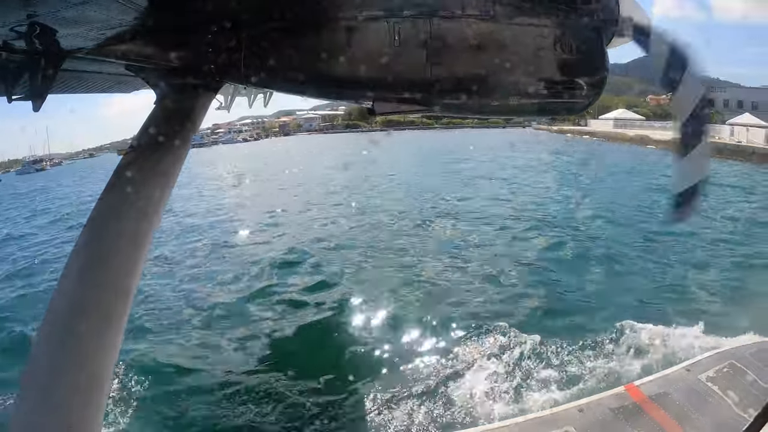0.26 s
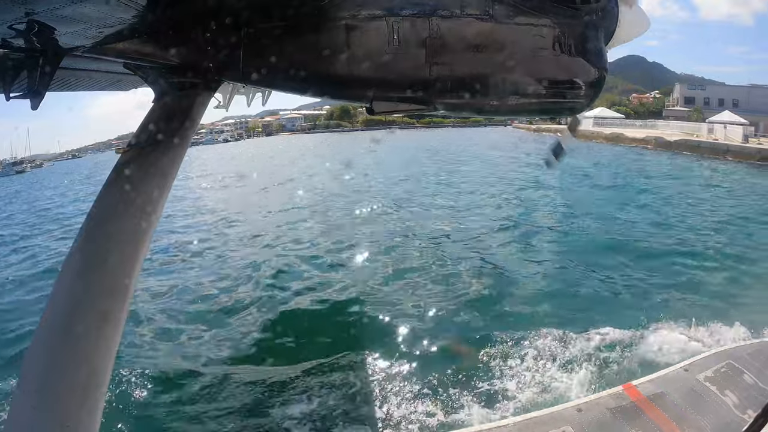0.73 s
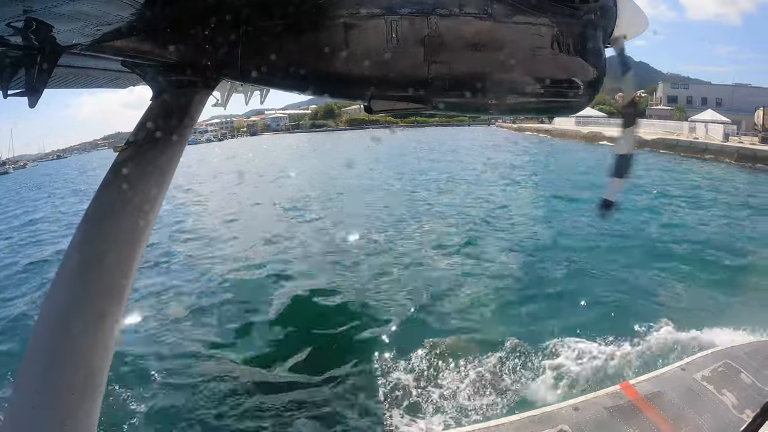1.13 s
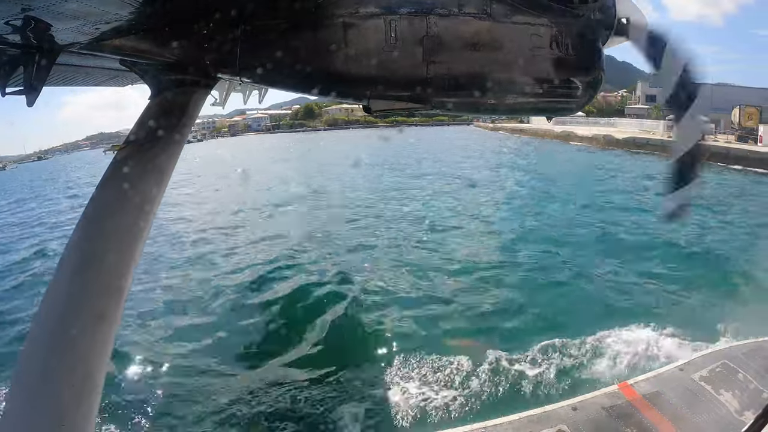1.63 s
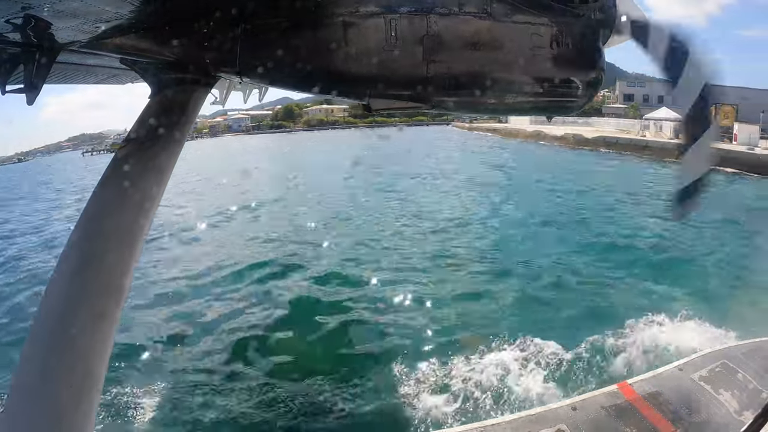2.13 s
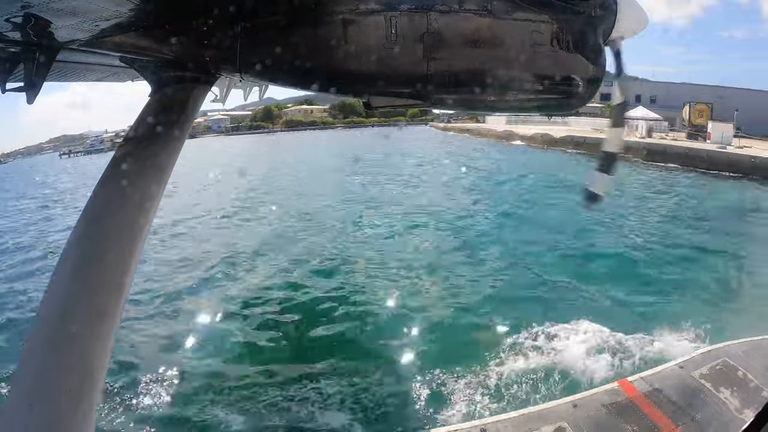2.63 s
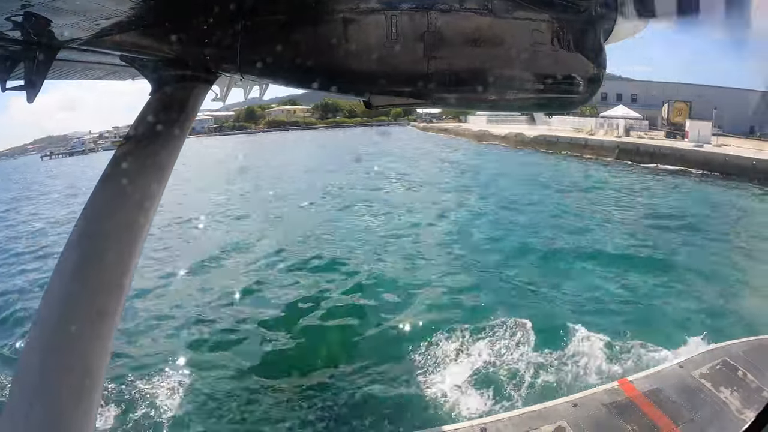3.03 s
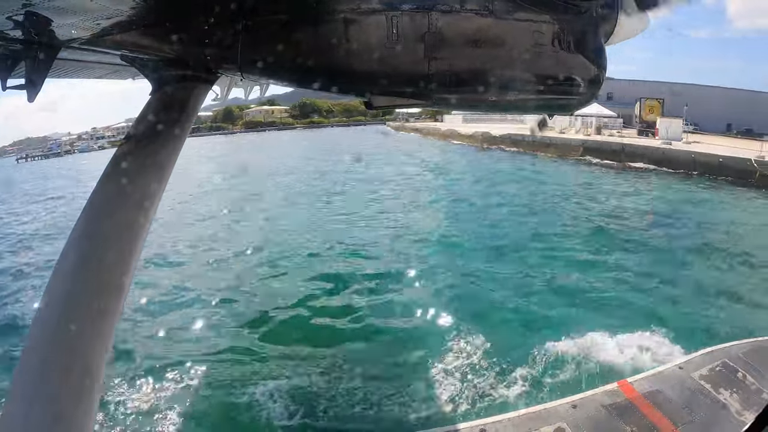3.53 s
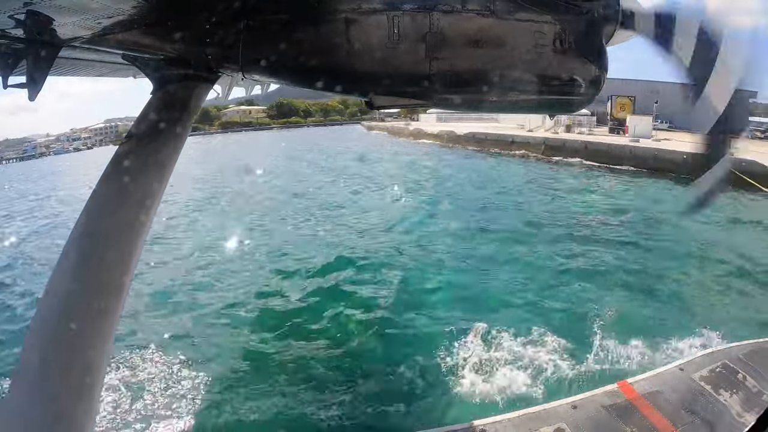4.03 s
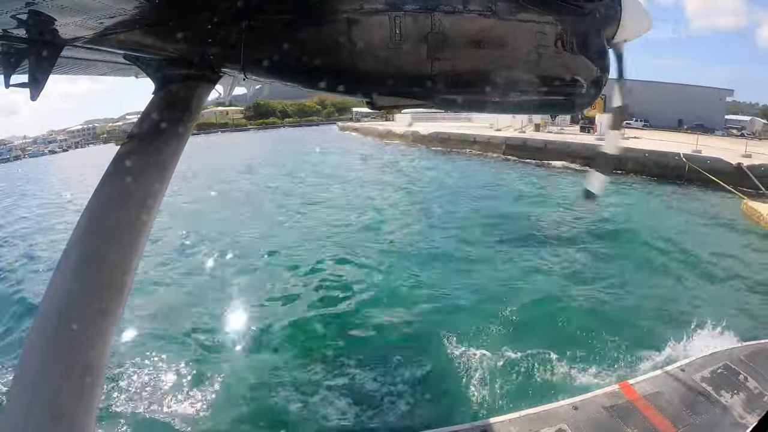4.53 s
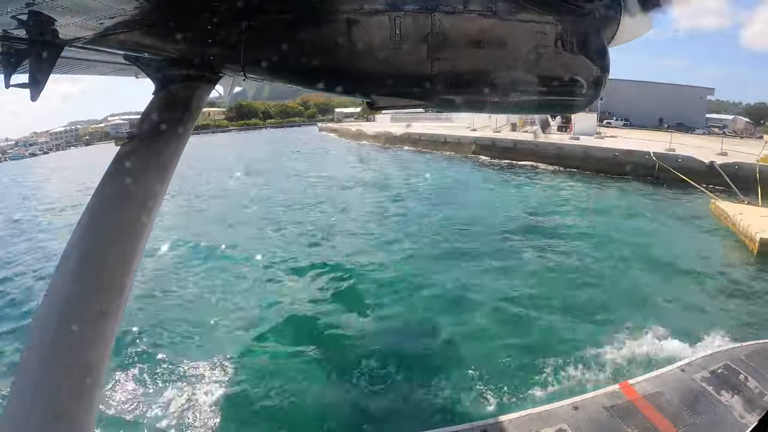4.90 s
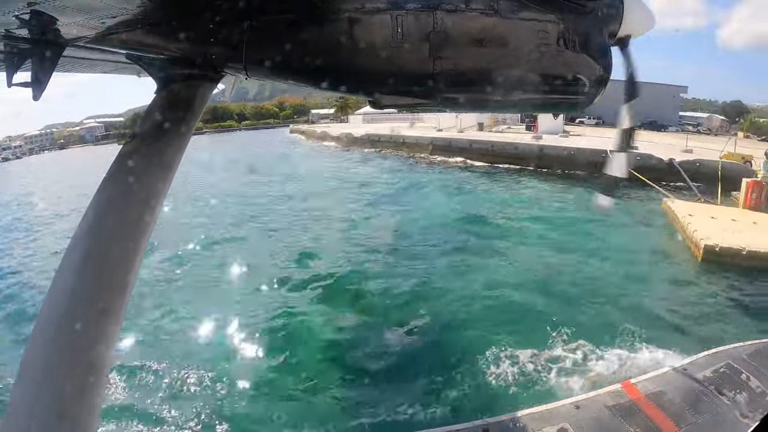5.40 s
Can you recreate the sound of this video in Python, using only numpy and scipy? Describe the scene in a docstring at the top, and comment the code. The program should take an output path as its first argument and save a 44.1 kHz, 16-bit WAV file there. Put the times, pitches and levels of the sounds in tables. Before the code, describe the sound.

Inside a floatplane cabin, turboprop propellers drone and throb deeply, sag slightly, then rise in pitch as power is added over a steady rushing roar.

```python
"""The near propeller of a twin turboprop floatplane taxiing on water, heard in the cabin: a harmonic series
on its blade rate, which slackens and then speeds up as power is added. The far propeller, a slower and
rougher series near idle, beats against it and almost fades out midway. The compressor whine dips, climbs
and then wavers, a modulated blade tone; a gearbox mesh tone rings out over narrow noisy tones of fixed pitch.
Exhaust, propeller wash and jet hiss are coloured noise, coming through the cabin wall."""
import sys
import numpy as np
from scipy import signal
from scipy.fft import rfft, irfft, next_fast_len
from scipy.io import wavfile

SR = 44100
rng = np.random.default_rng(int(sys.argv[2]) if len(sys.argv) > 2 else 0)


def unload_audio(sound):
    """Save the sound as a 16-bit wav file, at the path given as the first command line argument."""
    columns = np.transpose(np.atleast_2d(sound))
    # keep every value between -1 and 1, then stretch to whole-number steps
    steps = np.round(np.clip(columns, -1, 1) * 32767)
    wavfile.write(sys.argv[1], SR, steps.astype(np.int16))


N = 249606
TIME = np.arange(N) / SR   # s


def from_db(db):
    """Level to amplitude: 20 dB is a factor of ten."""
    return 10 ** (np.asarray(db) / 20)


def rms_one(x):
    """Normalisation to unit mean-square power."""
    return x / np.sqrt(np.mean(np.abs(x) ** 2) + 1e-20)


def in_time(rows):
    """Linear interpolation of each column of a time table, sample by sample."""
    s, *columns = np.transpose(rows)
    return [np.interp(TIME, s, column) for column in columns]


def swells(rows):
    """Gaussian bells in dB, superposed; each length is the full width at half height."""
    return sum(db * .5 ** ((2 * (TIME - s) / length) ** 2) for s, length, db in rows)


def angle_of(hz):
    """Phase is the time integral of frequency, here from a random start."""
    return 2 * np.pi * (np.cumsum(hz) / SR + rng.random())


def random_phase():
    """A phase drawn uniformly from the full circle."""
    return 2 * np.pi * rng.random()


def drift(rate):
    """Low-pass random process of unit power: noise through two equal poles with corner `rate` in Hz."""
    step = 40   # samples between the points drawn
    settling = 2000   # points dropped while the filter settles
    r = np.exp(-2 * np.pi * rate * step / SR)
    noise = rng.standard_normal(N // step + 2 + settling)
    slow = signal.lfilter([1], [1, -2 * r, r * r], noise)[settling:]
    return np.interp(np.arange(N) / step, np.arange(len(slow)), rms_one(slow))


def coloured_noise(spectrum):
    """Spectral shaping of white noise to unit power, falling 36 dB per octave beyond both ends."""
    hz, db = np.transpose(spectrum)
    size = next_fast_len(N)
    octave = np.log2(np.maximum(np.fft.rfftfreq(size, 1 / SR), 1))
    outside = np.abs(octave - np.clip(octave, np.log2(hz[0]), np.log2(hz[-1])))
    gain = from_db(np.interp(octave, np.log2(hz), db) - 36 * outside)
    shaped = irfft(rfft(rng.standard_normal(size)) * gain, size)
    return rms_one(shaped[:N])


def tone(angle, rough, rate):
    """Partly coherent partial of nominal unit power: turbulence scatters the amplitude share `rough`."""
    rough = np.clip(rough, 0, 1)
    steady = np.sqrt(2 * (1 - rough ** 2)) * np.cos(angle)
    scattered = drift(rate) * np.cos(angle) + drift(rate) * np.sin(angle)
    return steady + rough * scattered


def cabin_gain(hz):
    """Resonance: the cabin's air modes lift a tone that lies near their frequencies."""
    # air modes of the cabin: (f/Hz, full width at half the dB lift/Hz, lift/dB)
    modes = [(77.7, 12.2, 6), (86.4, 12, 4), (136.2, 10.8, 10.5), (148.1, 13.8, 9.5), (162.2, 12.5, 9.5),
             (195.9, 5.1, 9), (246.6, 18.4, 11.5), (268.3, 6.9, 7), (354, 13, 11), (391.5, 11, 8),
             (417, 34, 9.5), (515, 32, 3.5), (627, 61, 7.5), (814, 34, 7)]
    return from_db(sum(db / (1 + (2 * (hz - mode_hz) / width) ** 2) for mode_hz, width, db in modes))


def turbulence(spectrum, blade, chop, flutter_db):
    """Amplitude modulation of rushing air, at every blade passage and at random."""
    surge = 1 + np.clip(chop, 0, 1) * np.cos(blade)
    flutter = from_db(flutter_db * drift(24))
    return rms_one(coloured_noise(spectrum) * surge * flutter)


def roar(blade):
    """Broadband flow noise: rumble, wash and hiss follow one airflow, coloured by cabin wall and window."""
    # airflow strength, of which only the swing about its mean acts: (t/s, level/dB)
    flow = [(0, -44), (.6, -45), (1.2, -45), (1.7, -43), (2.5, -46.5), (2.8, -44), (3.8, -43.5),
            (4.7, -42.5), (5.2, -41), (5.5, -43.5), (5.66, -41)]
    # spectrum of the exhaust rumble: (f/Hz, relative level/dB)
    rumble_colour = [(12, -9), (30, -19), (60, 3), (90, 1), (118, -3.5), (170, 1), (245, 2), (300, -2),
                     (365, -5), (430, 1.5), (520, -1), (570, -5.5), (680, -9), (860, -7.5), (1000, -21)]
    # spectrum of the propeller wash: (f/Hz, relative level/dB)
    wash_colour = [(700, -3), (1000, -2), (1350, 1.5), (1550, -2), (1700, -0.5), (2050, -2.5), (2290, -8),
                   (2600, -8), (2950, -1.5), (3180, -2), (3420, -6), (3650, -15), (4300, -35)]
    # spectrum of the jet hiss: (f/Hz, relative level/dB)
    hiss_colour = [(3000, -13), (3700, 3), (4600, 1.5), (5600, -1), (6500, -4.5), (7200, -6.5), (8300, -8),
                   (9200, -12.5), (10200, -15.5), (11400, -21), (12400, -17), (13100, -15), (13900, -25),
                   (15700, -23)]
    # surges and sags of the rumble: (t/s, length/s, level change/dB)
    rumble_surges = [(1.25, .3, -0.5), (2.6, .25, 2.5), (3.05, .4, 1.5), (5.4, .18, -4)]
    rumble_db, wash_db, hiss_db = -21, -33.5, -44   # at mean flow, before the rumble's surges
    rumble_follows, wash_follows, hiss_follows = 0.39, 1, 1.0   # share of the flow's swing in dB

    flow_db = in_time(flow)[0]
    swing_db = flow_db - flow_db.mean()
    rumble_gain = from_db(rumble_db + rumble_follows * swing_db + swells(rumble_surges))
    wash_gain = from_db(wash_db + wash_follows * swing_db)
    hiss_gain = from_db(hiss_db + hiss_follows * swing_db)
    rumble = rumble_gain * turbulence(rumble_colour, blade, chop=0.14, flutter_db=0.5)
    wash = wash_gain * turbulence(wash_colour, blade, chop=0.065, flutter_db=0.7)
    hiss = hiss_gain * turbulence(hiss_colour, blade, chop=0.066, flutter_db=0.6)
    return rumble + wash + hiss


def fixed_tones(mesh_hz=1235, mesh_db=-47):
    """Narrow-band noise at fixed pitch: a gearbox mesh tone that rings out over steady noisy tones."""
    # narrow steady noisy tones: (f/Hz, corner of the random modulation/Hz, level/dB)
    narrow_tones = [(1678, 35, -47), (2407, 22, -59.5), (4380, 40, -60), (4960, 16, -61), (7960, 270, -68),
                    (10120, 220, -74)]
    # moments when the mesh tone rings out: (t/s, length/s, rise/dB)
    mesh_flares = [(2.8, 0.35, 11.5), (5.08, .2, 7), (5.6, 0.35, 9)]

    mesh_gain = from_db(mesh_db + swells(mesh_flares))
    mesh = mesh_gain * tone(2 * np.pi * mesh_hz * TIME, rough=0.87, rate=20)
    steady = sum(from_db(db) * tone(2 * np.pi * hz * TIME, rough=1, rate=corner)
                 for hz, corner, db in narrow_tones)
    return mesh + steady


def compressor(octave_db=-13, octave_fall_db=24, skirt_db=-2, skirt_rise_db=5, flicker_db=1.5):
    """Modulated blade-passing tone; as pitch climbs its noise sidebands grow and its octave fades."""
    # compressor speed as its blade tone: (t/s, f/Hz)
    blade_hz = [(0, 6300), (.6, 6040), (1.22, 5870), (1.6, 6110), (2.6, 6850), (3.3, 7530), (4.05, 8330),
                (4.75, 7830), (5.32, 8380), (5.66, 7980)]
    # flares of the tone's core: (t/s, length/s, rise/dB)
    whine_flares = [(.35, 0.15, 9), (1.17, 0.15, 7), (3.3, 0.11, 10)]
    whine_db, whine_fall_db = -52, 9.5   # level at the lowest pitch before flicker, fall per octave climbed

    hz = in_time(blade_hz)[0]
    climb = np.log2(hz / hz.min())   # octaves above the lowest pitch
    blade = angle_of(hz * (1 + 0.0019 * drift(16.2)))
    # skirt and octave levels are relative to the unflared core; their slopes are per octave climbed
    core = from_db(swells(whine_flares)) * tone(blade, rough=0.58, rate=44)
    skirt = from_db(skirt_db + skirt_rise_db * climb) * tone(blade, rough=1, rate=290)
    octave = from_db(octave_db - octave_fall_db * climb) * tone(2 * blade, rough=1, rate=110)
    level_db = whine_db - whine_fall_db * climb + flicker_db * drift(9.2)
    return from_db(level_db) * (core + skirt + octave)


def far_propeller(rough_per_order=.13):
    """Harmonic series of the propeller on the other wing, near idle; coherence falls with order."""
    # blade-passing rate: (t/s, f/Hz)
    blade_hz = [(0, 48.4), (.7, 47.1), (2.0, 42.8), (3.0, 50), (5.66, 53.7)]
    # level of the whole series: (t/s, level/dB)
    series_db = [(0, -25), (.4, -21.5), (1.4, -22.5), (2.0, -31), (2.8, -24.5), (3.35, -49), (4.4, -26),
                 (5.66, -23)]
    # harmonics: (multiple, level relative to the series before flares and cabin lift/dB)
    orders = [(1, -3.5), (2, -10), (3, -19), (4, -10), (5, -17), (6, -11.5), (7, -20.5), (8, -14.5),
              (9, -26.5), (10, -16)]
    # flares, strongest in the upper harmonics: (t/s, length/s, rise per multiple/dB)
    flares = [(.66, 0.11, 0.84), (1.22, 0.16, 0.75)]

    hz, db, flare_db = in_time(blade_hz)[0], in_time(series_db)[0], swells(flares)
    blade = angle_of(hz)
    total = 0
    for k, order_db in orders:
        gain = from_db(db + order_db + k * flare_db) * cabin_gain(k * hz)
        total = total + gain * tone(k * blade, rough=rough_per_order * k, rate=6.3)
    return total


def near_propeller(hz, blade, shaft_db=-43):
    """Harmonics excite the cabin modes they cross; uneven inflow makes low ones waver and smears upper ones."""
    # clean low harmonics: (multiple, level at the lowest speed before surges and cabin lift/dB)
    low_orders = [(1, -23.5), (2, -32.5), (3, -31.5), (4, -41)]
    # upper harmonics: (multiple, level before cabin lift/dB)
    upper_orders = [(5, -36.5), (6, -38.5), (7, -43.5), (8, -42), (9, -45), (10, -45.5), (11, -53.5),
                    (12, -50)]
    # brief swells and sags of the hum: (t/s, length/s, level change/dB)
    hum_surges = [(.17, 0.1, -10), (.35, 0.16, 2.5), (.62, 0.071, -4), (.95, 0.3, -3.5), (1.9, 0.33, 2),
                  (2.4, .21, -1), (4.44, .06, -1), (4.6, 0.053, -3), (5.43, 0.16, -4.5)]
    load_db_per_octave = 7.0   # growth with speed
    rough_per_order, waver_hz = .07, 7   # scattered share per multiple, corner of its modulation

    load = from_db(load_db_per_octave * np.log2(hz / hz.min()) + swells(hum_surges))
    low = 0
    for k, db in low_orders:
        partial = tone(k * blade + random_phase(), rough=rough_per_order * k, rate=waver_hz)
        low = low + from_db(db) * cabin_gain(k * hz) * partial
    upper = 0
    for k, db in upper_orders:
        partial = tone(k * blade + random_phase(), rough=0.8, rate=7.3)
        upper = upper + from_db(db) * cabin_gain(k * hz) * partial
    # three slightly unequal blades add a throb once a turn
    turn = blade / 3
    throb = from_db(shaft_db) * (tone(turn, rough=.6, rate=3.5) + tone(2 * turn, rough=0.51, rate=1.4))
    return load * (low + throb) + upper


def scene():
    """Superposition of both engines at a window seat; the near blade phase also modulates the roar."""
    # blade-passing rate of the near propeller: (t/s, f/Hz)
    near_hz = [(0, 67.0), (1.2, 65.2), (1.6, 66.4), (2.0, 68.7), (2.5, 70.1), (3.5, 78.2), (4.0, 83.5),
               (4.3, 86.4), (4.6, 87.7), (5.66, 90.4)]
    hz = in_time(near_hz)[0]
    blade = angle_of(hz)
    background = roar(blade) + fixed_tones() + compressor()
    return (background + far_propeller() + near_propeller(hz, blade))[None]


def record(dry, top=2.6):
    """Soft saturation rounds the highest peaks; a steep elliptic low-pass then removes the top of the band."""
    cutoff_hz = 15700
    low_pass = signal.ellip(12, .1, 90, cutoff_hz, fs=SR, output="sos")   # ripple and stopband in dB
    return signal.sosfilt(low_pass, top * np.tanh(dry / top))


dry = scene()
out = record(dry)
unload_audio(out)
```